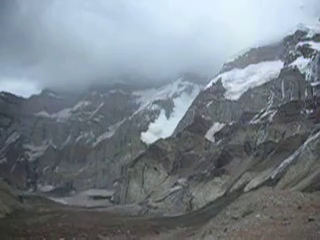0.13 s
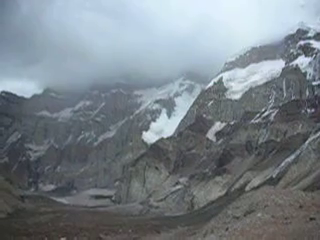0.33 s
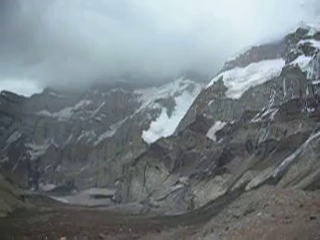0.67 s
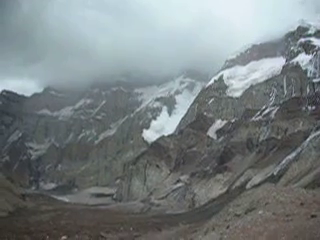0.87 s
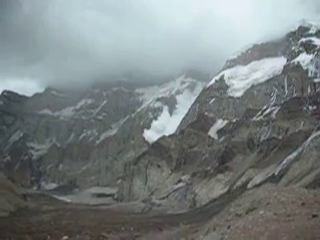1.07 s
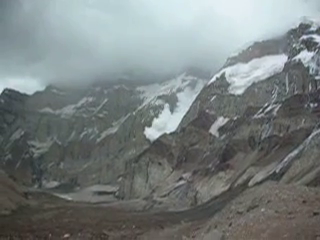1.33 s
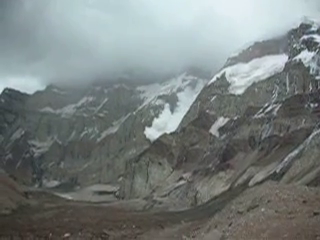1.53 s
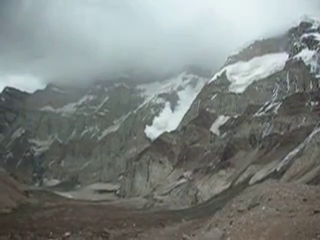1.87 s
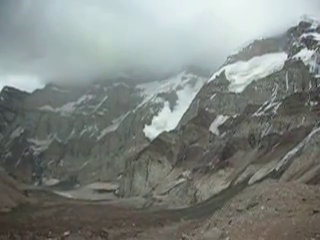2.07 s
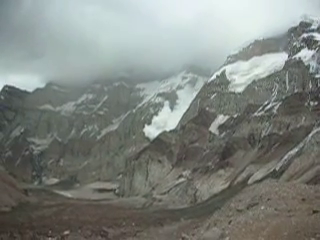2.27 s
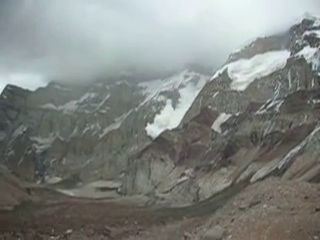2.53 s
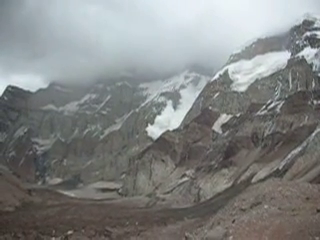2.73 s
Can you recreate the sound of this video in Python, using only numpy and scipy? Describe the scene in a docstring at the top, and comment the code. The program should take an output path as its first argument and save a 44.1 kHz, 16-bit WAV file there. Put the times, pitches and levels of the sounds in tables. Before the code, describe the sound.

A distant avalanche pours down a mountain face in a dull, steady rush. Strong wind flutters and thumps on the microphone at the start, then weaker gusts follow; coarse, hissy small-camera sound in a wide open valley.

```python
"""A mountain valley: a far avalanche pours down the face, a dull, steady rush smoothed by the wide valley.
The rush is noise in drifting patches, and a deeper surge of noise joins it near the end.
Gusts (swelling low noise) and eddies (short pulses) flutter and thump on the microphone, hardest at
the start. There is also one tiny tick and one dry knock (short fading tones).
A small camera records it coarsely, in big steps at 8 kHz, which adds a grainy hiss."""
import sys
import numpy as np
from scipy import signal
from scipy.fft import rfft, irfft
from scipy.io import wavfile
from scipy.ndimage import uniform_filter1d

SR = 44100
rng = np.random.default_rng(int(sys.argv[2]) if len(sys.argv) > 2 else 0)


def int16_out(signal):
    """Quantize to a 16-bit WAV file."""
    q = np.round(np.clip(np.atleast_2d(signal).T, -1, 1) * 32767)
    wavfile.write(sys.argv[1], SR, q.astype(np.int16))


N = 127449
T = np.arange(N) / SR  # time of every sample, in seconds


def amp(db):
    """Turns decibels into a gain."""
    return 10 ** (np.asarray(db) / 20)


def unit(x):
    """Scales a sound to an average (rms) strength of 1."""
    return x / np.sqrt(np.mean(x ** 2) + 1e-20)


def level(points):
    """Draws a gain over time through (time_s, level_db) points."""
    times, levels = np.transpose(points)
    return amp(np.interp(T, times, levels))


def colour(points, hz):
    """Draws a gain over frequency through (frequency_hz, level_db) points, along a log scale."""
    frequencies, levels = np.transpose(points)
    return amp(np.interp(np.log(hz + 1), np.log(frequencies), levels))


def noise(shape):
    """Makes noise of strength 1 by multiplying the spectrum of white noise by shape(hz)."""
    spectrum = rfft(rng.standard_normal(N))
    hz = np.fft.rfftfreq(N, 1 / SR)
    return unit(irfft(spectrum * shape(hz), N))


# Tone of the distant rush: frequency_hz [Hz], level_db [relative dB per Hz]
RUSH_COLOUR = [(30, -15), (100, -10), (180, -9.5), (290, -1.5), (490, .3), (720, -3), (1000, -5.6),
               (1400, -10.6), (2200, -15.8), (3800, -18.7)]
# Strength of the rush over time: time_s [s], level_db [dB]
RUSH_STRENGTH = [(0.07, -45.3), (0.7, -46.2), (1.15, -46.2), (1.45, -44.9), (1.68, -44.8), (1.85, -46.6),
                 (2.35, -45.4), (2.65, -45.7), (2.9, -45)]
# Strength of a surge of tumbling snow over time: time_s [s], level_db [dB]
SURGE_STRENGTH = [(2.55, -65.5), (2.74, -53), (2.84, -45), (2.9, -51.5)]
SURGE_HZ, SURGE_OCTAVES = 430, .35  # middle and spread of the surge's bell-shaped spectrum


def avalanche(patchy_db=1.3):
    """Sliding snow far away: a rush of noise in drifting patches, with a deeper surge near the end."""
    window, hop = 1024, 256  # samples
    hz = np.fft.rfftfreq(window, 1 / SR)
    real, imag, patches = rng.standard_normal((3, N // hop + 5, len(hz)))
    # blur the patches over 12 moments in time, then over 9 neighbouring frequencies
    patches = uniform_filter1d(patches, size=12, axis=0)
    patches = unit(uniform_filter1d(patches, size=9, axis=1))
    field = (real + 1j * imag) * colour(RUSH_COLOUR, hz) * amp(patchy_db * patches)
    _, rush = signal.istft(field.T, nperseg=window, noverlap=window - hop)
    rush = unit(rush[:N])

    def surge_shape(f):
        octaves_away = np.log2((f + 1) / SURGE_HZ)
        return np.exp(-.5 * (octaves_away / SURGE_OCTAVES) ** 2)

    surge = noise(surge_shape)
    return rush * level(RUSH_STRENGTH) + surge * level(SURGE_STRENGTH)


EDDY_RADIANS = 2.0  # width of the bell that fades each eddy, in radians of its wave


def eddy(at, hz):
    """An eddy passing the microphone: a suction, then a push."""
    phase = 2 * np.pi * hz * (T - at)
    return np.sin(phase) * np.exp(-.5 * (phase / EDDY_RADIANS) ** 2)


# Strong gusts that flutter, each a short run of eddies. The level is set before the eddy's bell:
# start_s [s], first_eddy_db [dB], eddies_per_s [1/s], length_s [s]
FLUTTER_RUNS = [(0.0775, -14, 137, .02), (0.127, -16.5, 110, .014)]
FLUTTER_HZ, FLUTTER_FADE_DB_PER_S = 165, 80
# Single eddies thumping the microphone. The level is set before the eddy's bell:
# centre_s [s], level_db [dB], pitch_hz [Hz]
SINGLE_THUMPS = [(0.1045, -25, 130), (0.152, -23, 115), (0.261, -31, 215), (0.293, -25.5, 145),
                 (1.0005, -29, 140), (2.0295, -33, 120), (2.196, -33, 195), (2.272, -37, 130)]


def buffets():
    """Eddies hit the microphone in fading runs or one at a time."""
    out = np.zeros(N)
    for start_s, first_eddy_db, eddies_per_s, length_s in FLUTTER_RUNS:
        for delay in np.arange(0, length_s, 1 / eddies_per_s):
            eddy_db = first_eddy_db - FLUTTER_FADE_DB_PER_S * delay
            out += amp(eddy_db) * eddy(start_s + delay, FLUTTER_HZ)
    for centre_s, level_db, pitch_hz in SINGLE_THUMPS:
        out += amp(level_db) * eddy(centre_s, pitch_hz)
    return out


# Tone of the turbulence on the microphone: frequency_hz [Hz], level_db [relative dB per Hz]
WIND_COLOUR = [(25, -22), (55, -11), (90, 0), (130, -0.5), (220, -7), (330, -16), (500, -26), (1000, -44),
               (3000, -67.5)]
# Gusts; rise and fall are the times to change by a factor of e:
# peak_s [s], level_db [dB], rise_s [s], fall_s [s]
GUST_LIST = [(0.145, -31, .035, .06), (0.255, -38, .012, .025), (0.312, -35.5, .015, .025),
             (0.452, -48, .012, .02), (0.51, -49, .025, .09), (0.72, -54.5, .06, .07),
             (0.953, -43, .02, .025), (1.045, -43, .025, .055), (2.05, -45, .02, .06),
             (2.205, -49, .012, .025), (2.285, -50, .015, .05), (2.4, -54, .04, .05), (2.73, -51, .02, .06)]


def gusts():
    """Low turbulence noise that swells and dies with each gust; overlapping gusts add their power."""
    power = np.zeros(N)
    for peak_s, level_db, rise_s, fall_s in GUST_LIST:
        distance = np.maximum((peak_s - T) / rise_s, (T - peak_s) / fall_s)
        power += (amp(level_db) * np.exp(-distance)) ** 2
    return np.sqrt(power) * noise(lambda f: colour(WIND_COLOUR, f))


TICK_S, TICK_DB, TICK_HZ, TICK_WIDTH_S = .7527, -34.5, 3380, .00058


def tick():
    """One tiny, bright tick close by: a high tone under a very short bell-shaped swell."""
    t = T - TICK_S
    swell = np.exp(-.5 * (t / TICK_WIDTH_S) ** 2)
    return amp(TICK_DB) * swell * np.sin(2 * np.pi * TICK_HZ * t)


KNOCK_S, KNOCK_DB, KNOCK_HZ, KNOCK_WIDTH_S = 2.6512, -27, 340, .0012


def knock():
    """One short, dry knock: a low tone that swells and fades quickly around a sharp downward peak."""
    t = T - KNOCK_S
    swell = np.exp(-abs(t) / KNOCK_WIDTH_S)
    return -amp(KNOCK_DB) * swell * np.cos(2 * np.pi * KNOCK_HZ * t)


def scene():
    """The far rush under the near wind, with the tick and the knock, in mono."""
    mono = avalanche() + buffets() + gusts() + tick() + knock()
    return mono[None]


HISS_DB = -59  # preamp hiss, ahead of the converter
CONVERTER_HZ, STEP, OFFSET = 8000, .0071, -.0497  # sample rate; step and offset on a full scale of 1
START_S = .0722  # silent until here
SMOOTHING_HZ, EDGE_HZ = 3830, 4540  # low-pass limits: leaving the converter, and at the very end


def record(dry):
    """Preamp hiss, a coarse converter that sits off centre, a short silence before the sound begins, then a
    band limit."""
    slow = signal.resample_poly(dry[0], CONVERTER_HZ, SR)
    hiss = amp(HISS_DB) * rng.standard_normal(len(slow))
    # rounding to big steps makes the grain
    stepped = np.round((slow + hiss + OFFSET) / STEP) * STEP
    # the smoothing filter works at the lowest rate that both sample rates divide
    common_hz = np.lcm(SR, CONVERTER_HZ)
    smoothing = signal.firwin(11001, SMOOTHING_HZ, window=("kaiser", 8), fs=common_hz)
    smooth = signal.resample_poly(stepped, SR, CONVERTER_HZ, window=smoothing)[:N]
    started = smooth * (T >= START_S)
    band_limit = signal.firwin(511, EDGE_HZ, window=("kaiser", 9), fs=SR)
    return signal.oaconvolve(started, band_limit, "same")[None]


dry = scene()
out = record(dry)
int16_out(out)
```